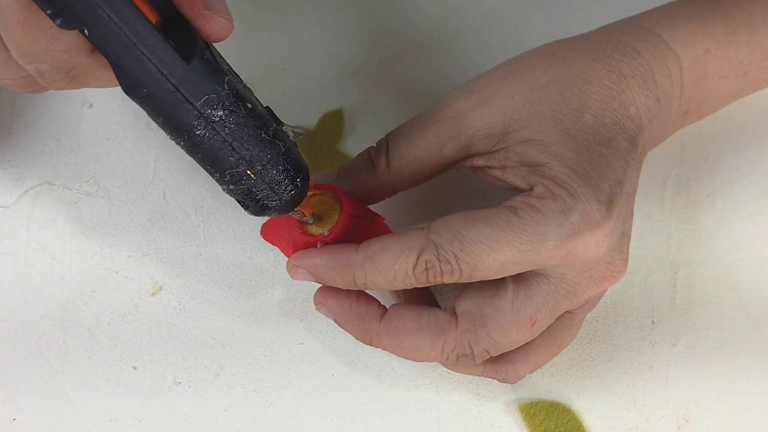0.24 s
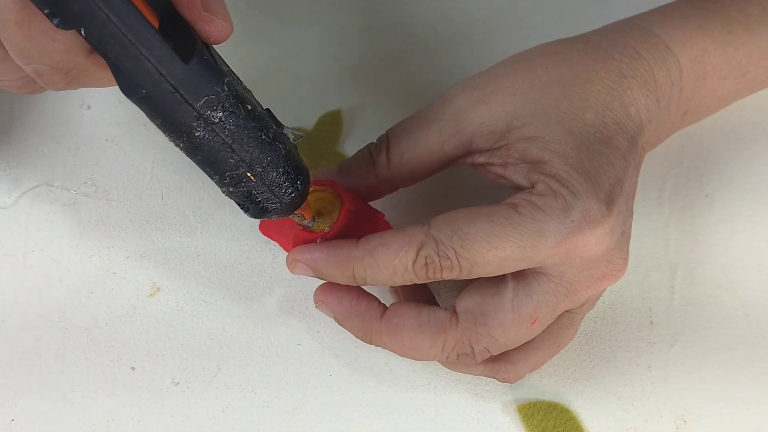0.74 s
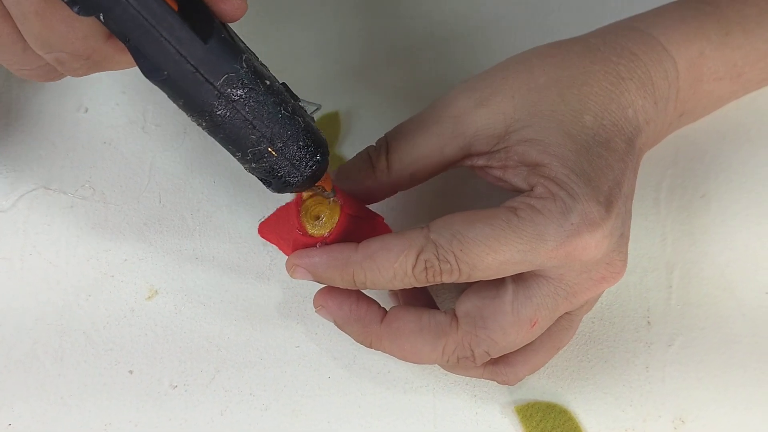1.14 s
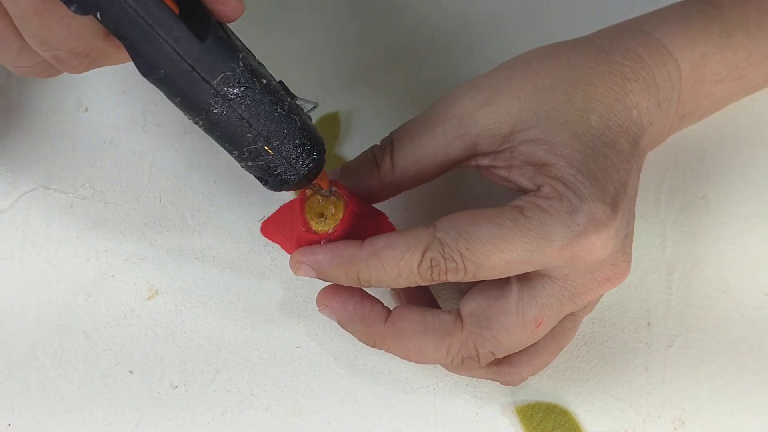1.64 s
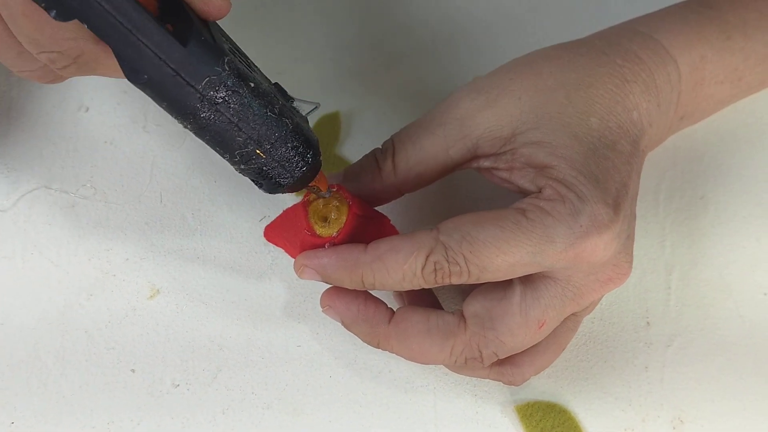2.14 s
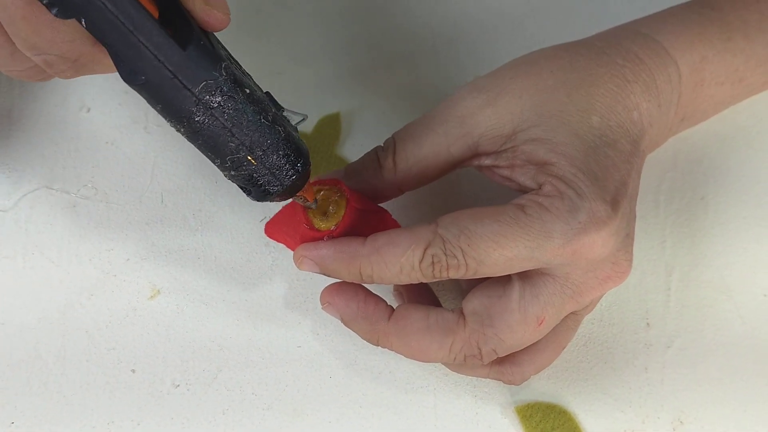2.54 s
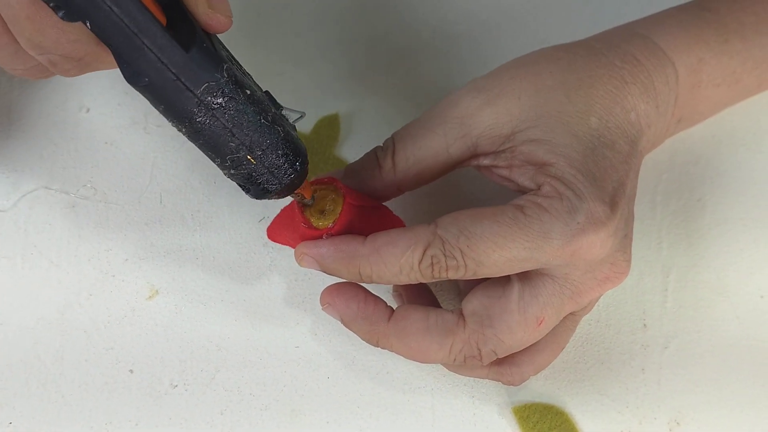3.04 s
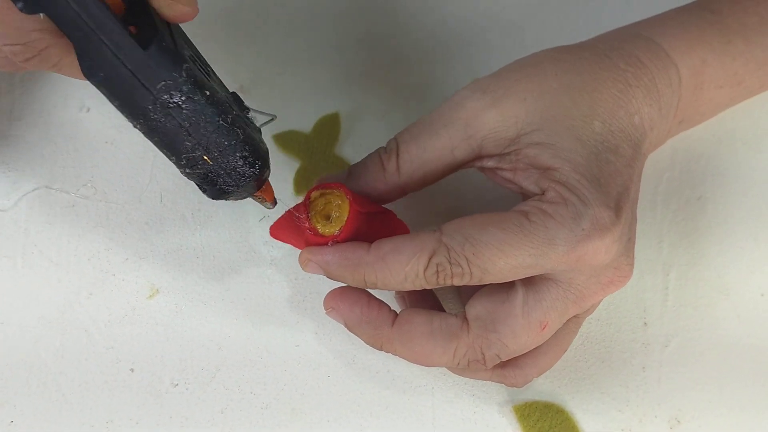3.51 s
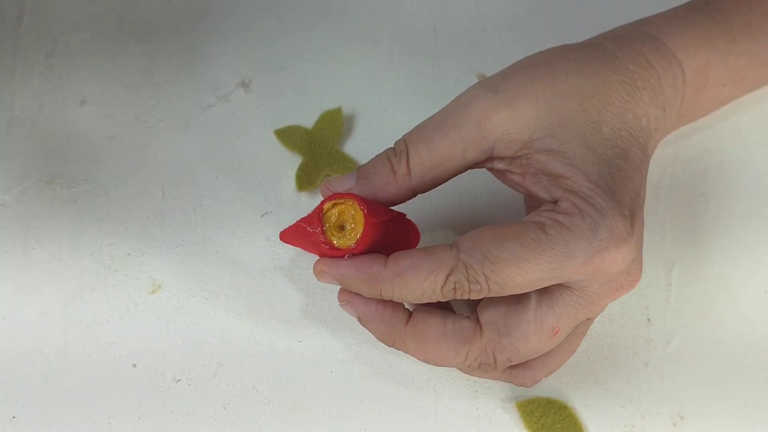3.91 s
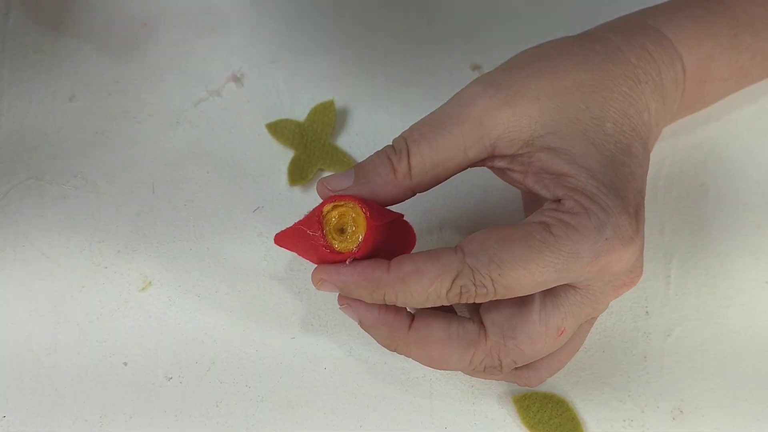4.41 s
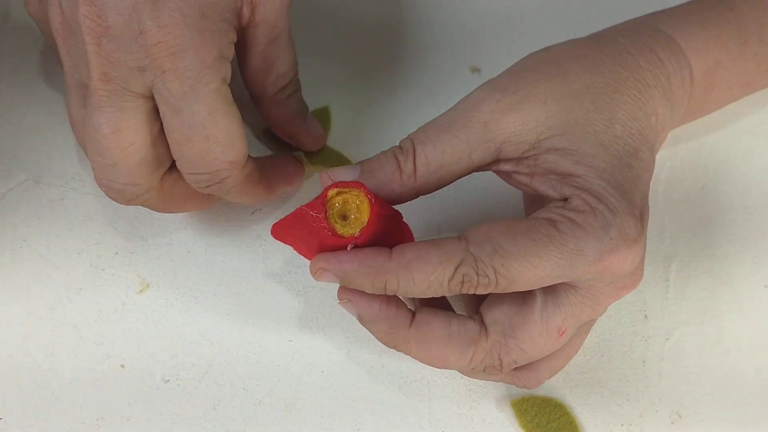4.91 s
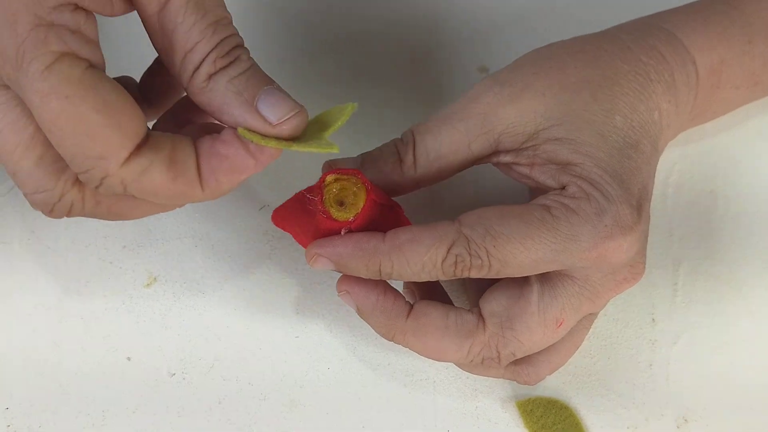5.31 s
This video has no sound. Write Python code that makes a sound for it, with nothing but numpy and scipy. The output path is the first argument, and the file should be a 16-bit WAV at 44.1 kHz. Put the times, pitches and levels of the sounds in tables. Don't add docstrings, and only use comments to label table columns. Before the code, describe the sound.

Over low fan hum and hiss, a glue gun clicks and rattles lightly, then lands on a tabletop in three quick knocks with felt rustling around it.

```python
import sys
import numpy as np
from scipy import signal
from scipy.fft import rfft, irfft, next_fast_len
from scipy.io import wavfile
from scipy.ndimage import uniform_filter1d

SR = 44100
rng = np.random.default_rng(int(sys.argv[2]) if len(sys.argv) > 2 else 0)


def boost(x):
    u = np.asarray(x, float) / 20
    return 10 ** u


def master(y):
    cut = np.clip(np.atleast_2d(y).T, -1, 1)
    pcm = np.round(cut * 32767)
    wavfile.write(sys.argv[1], SR, pcm.astype(np.int16))


N = 244755
T = np.arange(N) / SR
BOUNCE_CRACK_DB = -28


def unit(x):
    return x / np.sqrt(np.mean(x ** 2))


def on_log(points, hz):
    f, value = np.transpose(points)
    return np.interp(np.log(hz + 1), np.log(f), value)


def coloured(points):
    hz = np.fft.rfftfreq(N, 1 / SR)
    white = rfft(rng.standard_normal(N))
    return unit(irfft(white * boost(on_log(points, hz)), N))


def band(x, hz, octaves):
    edges = np.clip(hz * 2. ** (np.array([-.5, .5]) * octaves), 20, SR / 2.1)
    return signal.sosfilt(signal.butter(2, edges, "band", fs=SR, output="sos"), x)


def fade(t, t60):
    return np.exp(-np.log(1000) * t / t60)


def walk(rate):
    k = int(SR / rate)
    steps = np.repeat(rng.standard_normal(N // k + 1), k)
    return unit(uniform_filter1d(uniform_filter1d(steps, k), k)[:N])


def add(out, s, x):
    i = int(s * SR)
    out[i:i + len(x)] += x[:N - i]


def stroke(s, length, rise):
    x = np.interp(T, [s, s + np.clip(rise, .05, .95) * length, s + length], [0, 1, 0])
    return np.sin(np.pi / 2 * x) ** 2


def electronics():
    # f/Hz, level/dB
    whines = [(1739, -85), (4210, -78), (4450, -70), (5530, -76.5), (6950, -68.5), (7130, -73.5),
              (12250, -94)]
    whine = sum(boost(db) * np.sin(2 * np.pi * hz * T + 3.6 * walk(30)) for hz, db in whines)
    frames_per_s = 30
    from_pulse = (T * frames_per_s - .3 + .5) % 1 - .5
    gate = np.exp(-.5 * (from_pulse / 0.08) ** 2)
    buzz = band(band(rng.standard_normal(N), 14600, 0.11), 14600, 0.11)
    return whine + boost(-64.5) * gate * unit(buzz)


def background():
    # f/Hz, level/dB
    hum = [(247.6, -66.5), (349.9, -69), (398.4, -71), (527.6, -76), (694.4, -74.5), (742.9, -68),
           (866.7, -63.5), (1238, -78), (1739, -80)]
    # f/Hz, level per Hz/dB
    room_tone = [(15, -58), (25, -30), (27, -32), (46, -13.5), (181, 3), (243, 8.5), (271, -1), (344, 4),
                 (421, -3), (730, -4), (800, -3.5), (845, 0.5), (909, -6.5), (1790, -38), (2000, -10),
                 (2600, -74), (4400, -120)]
    # f/Hz, level per Hz/dB
    port_hiss = [(30, -7), (150, -11), (600, -7.5), (1300, -10.5), (1700, -14), (2400, -12), (3300, -15),
                 (4500, -14.5), (7000, -19), (7600, -20), (9700, -24.5), (12000, -20.5), (14500, -18),
                 (15700, -18.5)]
    # t/s, level/dB
    gain_drift = [(0.0, -71), (0.17, -70), (0.54, -73.5), (1.11, -72.5), (1.68, -70.5), (1.85, -67),
                  (3.62, -68), (3.77, -70), (4.05, -68.5), (4.16, -61.5), (4.28, -66.5), (4.62, -67),
                  (5.15, -67), (5.55, -67.5)]
    lines = 0
    for hz, db in hum:
        wavering_level = boost(db + 1.5 + 1.85 * walk(3.25))
        lines = lines + wavering_level * np.sin(2 * np.pi * hz * T + 0.6 * walk(4.15))
    fan = boost(-62.5 + 1.05 * walk(6.52)) * coloured(room_tone)
    hiss = np.array([boost(-55.5) * coloured(port_hiss) + electronics() for port in range(2)])
    gain = boost(np.interp(T, *np.transpose(gain_drift)) + 66.5)
    return gain * (lines + fan + hiss)


def room(x):
    # f/Hz, t60/s
    room_t60 = [(100, 0.28), (500, 0.29), (3000, 0.27), (8000, 0.092), (15000, 0.063)]
    t, tail = T[:SR // 2], 0
    for hz in 100 * 2. ** np.arange(8):
        shared = rng.standard_normal(len(t))
        own = rng.standard_normal((2, len(t)))
        apart = min(hz / 2500, 1)
        noise = (1 - apart) * shared + apart * own
        tail = tail + band(noise, hz, 1.0) * fade(t, on_log(room_t60, hz))
    tail = tail * np.clip(t / 0.00097 - .5, 0, 1)
    tail = tail / np.sqrt(np.mean(np.sum(tail ** 2, axis=1)))
    return signal.fftconvolve(x[None], tail, axes=1)[:, :N]


def squeak():
    # t/s, length/s, start f/Hz, end f/Hz
    chirps = [(2.51, .08, 13400, 13750), (2.6, .09, 12450, 13600), (2.7, .06, 12900, 13150),
              (2.79, .07, 13050, 11950)]
    out, waver = 0, boost(-68 + walk(30.3))
    for s, length, hz0, hz1 in chirps:
        hz = np.interp(T, [s, s + length], [hz0, hz1])
        whistle = np.sin(2 * np.pi * np.cumsum(hz) / SR)
        out = out + np.sqrt(stroke(s, length, .5)) * waver * whistle
    return out


def lift():
    scrape = unit(band(rng.standard_normal(N), 1720, 0.26))
    return stroke(4.7, 1, rise=0.1) * boost(-67 + 4.9 * walk(25)) * scrape


def rubs():
    # t/s, length/s, level/dB, air above 8 kHz/dB, scrape on the table/dB
    strokes = [(1.607, 0.15, -68.5, -6, 9), (1.908, 0.1, -53.5, -2.5, -1), (1.988, 0.098, -67, 1, 11.5),
               (3.704, 0.24, -65.5, 1.5, -5), (3.848, 0.22, -59.5, -1, 5), (3.985, 0.062, -54.5, -5, -4),
               (4.041, 0.12, -52, -5.5, 8.5), (4.163, 0.087, -55.5, -5, 13.5), (4.215, 0.12, -58, 1, -1),
               (4.448, 0.22, -57, -5.5, 10.5), (4.534, .12, -65.5, -12, 22.5)]
    slip_db = np.minimum(3.3 * rng.exponential(size=N), 17)
    grains = rng.standard_normal(N) * boost(slip_db) * boost(1.4 * walk(60.03))
    felt = unit(band(grains, 4800, 0.87))
    air = unit(band(grains, 11800, 0.7))
    table = unit(band(grains, 830, 2.63))
    out = 0
    for s, length, db, air_db, table_db in strokes:
        colour = felt + boost(air_db) * air + boost(table_db - 6.0) * table
        out = out + boost(db) * stroke(s, length, rise=0.28) * colour
    return out


def knocks(blows, modes, crack_db):
    out, t = np.zeros(N), T[:SR // 2]
    for k, (s, db, contact_ms, thud_db, thud_t60) in enumerate(blows):
        noise = rng.standard_normal(len(t))
        ring = 0
        for hz, mode_db, t60 in modes:
            ring = ring - boost(mode_db) * np.sin(2 * np.pi * hz * t) * fade(t, min(t60, .28))
        thud = boost(thud_db) * band(noise, 430, 5.0) * fade(t, thud_t60)
        push = np.sin(np.pi * np.clip(t[:SR // 100] * 1000 / contact_ms, 0, 1))
        pushed = np.convolve(ring + thud, push / push.sum())[:len(t)]
        crack_level = boost(BOUNCE_CRACK_DB if k else crack_db)
        crack = crack_level * band(noise, 3240, 1.56) * fade(t, thud_t60)
        add(out, s, boost(db) * (pushed + crack))
    return out


def table_knocks():
    # f/Hz, level/dB, t60/s
    land_modes = [(135.6, -13.5, 0.56), (211.7, -5.5, 0.16), (249.5, -12, 0.26), (312, -18.5, 0.34),
                  (627, -8, 0.061), (634, -21, 0.17), (810, -36, 0.35), (1116, -36, 5.0), (1540, -38, 0.46),
                  (1660, -29, 0.56)]
    rock_modes = [(132, -6, 0.33), (170.6, 0.5, 0.13), (243.6, -4, 0.43), (618, -16, 0.15), (673, -9, 0.12),
                  (857, -34, 0.68), (941, -13, 0.38), (1320, -35, 0.17), (1577, -36, 0.34),
                  (1728, -41, 5.0)]
    drop_modes = [(132, -18.5, 0.24), (204.7, -6.5, 0.19), (247, -12, 0.13), (314, -13.5, 0.12),
                  (373, -12, 0.07), (506, -14, 0.076), (573, -18, 0.11), (637, 4.5, 0.073),
                  (699.5, -6, 0.18), (865, -11.5, 0.11), (950, -7, 0.058), (1130, -26, 0.15),
                  (1179, -6, 0.12), (1530, -26, .05)]
    # t/s, level/dB, contact/ms, thud noise/dB, thud t60/s
    landing = [
        (4.0602, -22, 0.79, 4, 0.079),
        (4.087, -36, 1.7, -4, .15),
        (4.145, -35, 2.3, 8, 0.18),
    ]
    rocking = [
        (4.1888, -38.5, 0.29, 16, 0.025),
        (4.1915, -23.5, 1.75, -17, 0.1),
        (4.217, -25, 2.86, 10, 0.22),
        (4.252, -40, 3.4, 0, 0.21),
        (4.5155, -33.5, 1.66, 8, 0.17),
    ]
    dropping = [
        (4.5596, -16.5, 0.92, 6, 0.17),
        (4.589, -27, 2.3, -3, 0.13),
    ]
    nudges = [(1.72, -52, 6, 0, .1), (3.8, -55, 6, 0, .1), (3.885, -56, 4.5, 0, .1),
              (4.82, -57, 9.4, 0, .1)]
    out = knocks(landing, land_modes, crack_db=-22)
    out = out + knocks(rocking, rock_modes, crack_db=5.0)
    out = out + knocks(dropping, drop_modes, crack_db=-18.5)
    out = out + knocks(nudges, rock_modes, crack_db=BOUNCE_CRACK_DB)
    return signal.sosfilt(signal.butter(4, 108, "high", fs=SR, output="sos"), out)


def tick_kind(rows, body_db, air_db, ring_ms):
    out, t = np.zeros(N), T[:SR // 10]
    for s, db, hz in rows:
        burst = rng.standard_normal(len(t)) * fade(t, ring_ms / 1000)
        burst[0] += 3.0
        shell, body, air = band(burst, hz, 1.0), band(burst, 1600, 1.68), band(burst, 12200, 0.64)
        tick = 0
        for part, part_db in ((shell, 0), (body, body_db), (air, air_db)):
            tick = tick + boost(db + part_db) * part / np.abs(part).max()
        add(out, s + .0008, tick)
    return out


def ticks():
    # t/s, peak level/dB, shell resonance f/Hz
    flicks = [(1.2396, -56, 2800), (1.2489, -47, 7650), (1.2534, -52, 5590), (1.6814, -58, 5580),
              (1.6874, -50.5, 3920), (1.856, -59, 5500), (3.891, -50, 5500)]
    crisps = [(1.1877, -51, 3620), (3.5409, -47, 5330), (3.701, -44, 3730), (3.8013, -38.5, 7850),
              (3.9235, -41, 3600), (4.3256, -41.5, 5570)]
    pings = [(1.6945, -36, 2940), (1.716, -48, 2880), (1.7844, -58, 5500), (1.9739, -39.5, 2440),
             (1.9959, -32.5, 2930), (2.4194, -51, 2760), (3.8144, -47, 3230), (3.9983, -38.5, 3400)]
    clacks = [(1.6332, -47.5, 3340), (1.7389, -51, 3700), (2.5481, -50, 3540), (3.8846, -45, 3680),
              (4.0599, -34, 3600)]
    clicks = [(1.7739, -31, 5670), (2.0682, -38, 4830), (3.92, -36, 5400)]
    taps = [(0.2029, -55, 3000), (0.7487, -55, 5550), (0.8155, -52.5, 5490), (1.931, -43, 3160),
            (4.1879, -32.5, 3000), (5.4355, -54, 3100)]
    pats = [(2.2263, -50.5, 3140), (2.4643, -56.5, 2880), (4.5595, -34.5, 3200)]
    trigger = [(1.3488, -21, 3580), (1.352, -43, 5670)]
    out = tick_kind(flicks, body_db=-15, air_db=13, ring_ms=7.2)
    out += tick_kind(crisps, body_db=-10, air_db=1.6, ring_ms=10.5)
    out += tick_kind(pings, body_db=-34, air_db=-19, ring_ms=14)
    out += tick_kind(clacks, body_db=5.1, air_db=4.7, ring_ms=11.5)
    out += tick_kind(clicks, body_db=-16, air_db=-3, ring_ms=11)
    out += tick_kind(taps, body_db=2.9, air_db=-17, ring_ms=12.4)
    out += tick_kind(pats, body_db=13.3, air_db=-24, ring_ms=9.9)
    out += tick_kind(trigger, body_db=-3.5, air_db=-0.87, ring_ms=7.2)
    return out


def snap():
    # f/Hz, level/dB, t60/s
    shell_modes = [(204, -7, 0.16), (417, -31, 5.0), (590, -24, 0.042), (678, -31, 0.21), (840, -5, 0.072),
                   (1110, 10, 0.021), (1195, -33, 5.0)]
    # t/s, level/dB, contact/ms, thud noise/dB, thud t60/s
    snaps = [
        (1.3496, -38, 0.83, 20.5, 0.014),
    ]
    # t/s, f/Hz, width/octaves, peak level/dB, t60/ms
    cracks = [(1.3498, 14400, .25, -19, 5), (1.3498, 12200, .2, -21, 5), (1.3497, 2700, .9, -25, 6),
              (1.3521, 13000, .7, -34, 6), (4.5612, 12400, .5, -41, 30), (1.9968, 1800, .9, -40, 12)]
    out, t = knocks(snaps, shell_modes, crack_db=2.0), T[:SR // 50]
    for s, hz, octaves, db, ms in cracks:
        crack = band(rng.standard_normal(len(t)) * fade(t, ms / 1000), hz, octaves)
        add(out, s, boost(db) * crack / np.abs(crack).max())
    return out


def ports(x, lead_us, left_db, shade_db):
    low = signal.sosfilt(signal.butter(1, 1500, fs=SR, output="sos"), x)
    high = x - low
    left = boost(left_db) * low + boost(shade_db) * high
    right = low + boost(3) * high
    hz = np.fft.rfftfreq(N, 1 / SR)
    early = np.exp(2j * np.pi * hz * lead_us / 1e6)
    return np.array([irfft(rfft(left) * early, N), right])


def scene():
    gun = ticks() + snap() + boost(1) * squeak()
    table = table_knocks()
    felt = rubs() + lift()
    near = ports(gun + felt, lead_us=58.26, left_db=-3.5, shade_db=-37)
    near = near + ports(table, lead_us=84.35, left_db=-0.5, shade_db=6.0)
    echoes = room(boost(-15) * gun + boost(-6.5) * felt + boost(-13) * table)
    return near + echoes + background()


def roll_off(x):
    return signal.sosfilt(signal.butter(12, 16800, fs=SR, output="sos"), x)


def record(dry):
    size = next_fast_len(N + 999)
    hz = np.fft.rfftfreq(size, 1 / SR)
    lag_ms = 0.4515
    late = 0.84 / (1 + hz / 28000) * np.exp(-2j * np.pi * hz * lag_ms / 1000)
    shelf = boost(-2.0) * (1 + 6.44 / (1 + 1j * hz / 90))
    top = 1 / (1 + (hz / 15780) ** 500)
    pair = rfft(dry, size)
    wide = irfft((pair - late * pair[::-1]) * shelf * top, size)[:, :N]
    wide = signal.sosfilt(signal.butter(2, 70, "high", fs=SR, output="sos"), wide)
    return roll_off(wide)


dry = scene()
out = record(dry)
master(out)
```